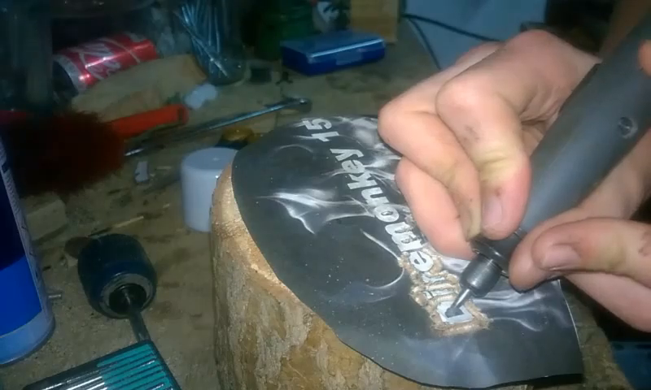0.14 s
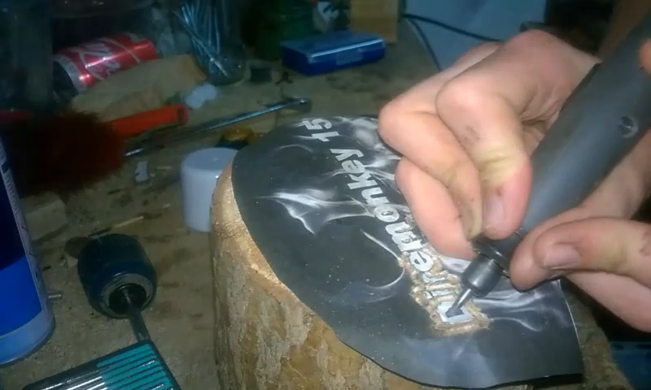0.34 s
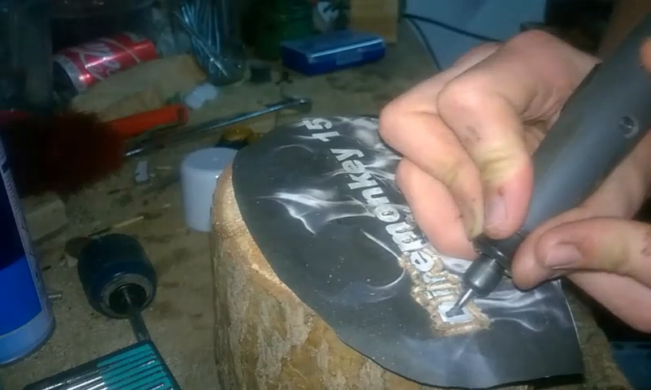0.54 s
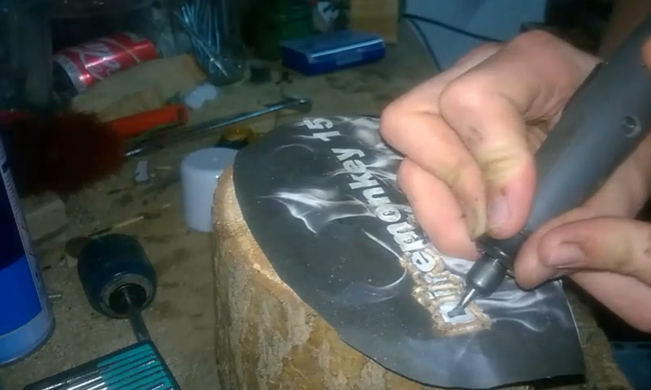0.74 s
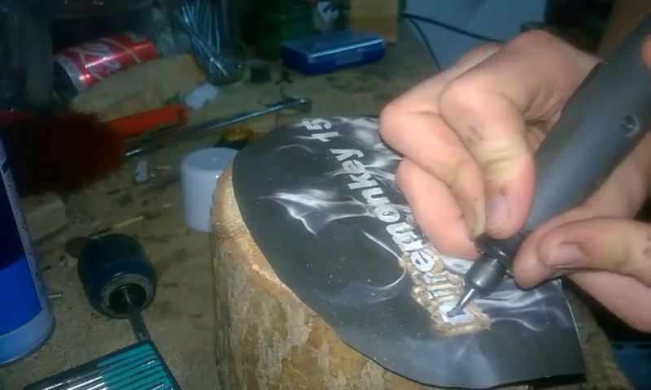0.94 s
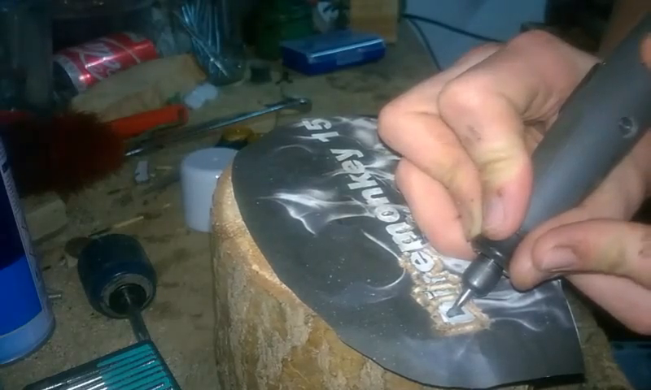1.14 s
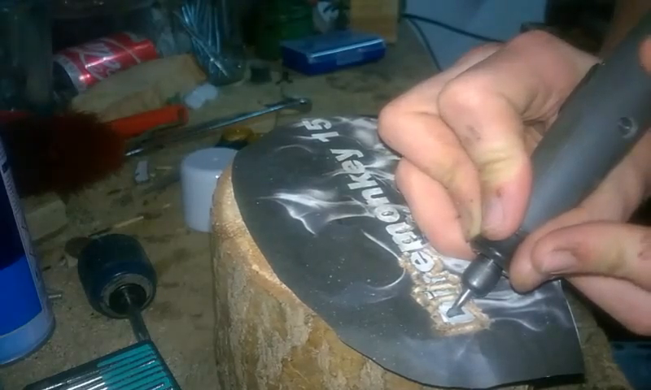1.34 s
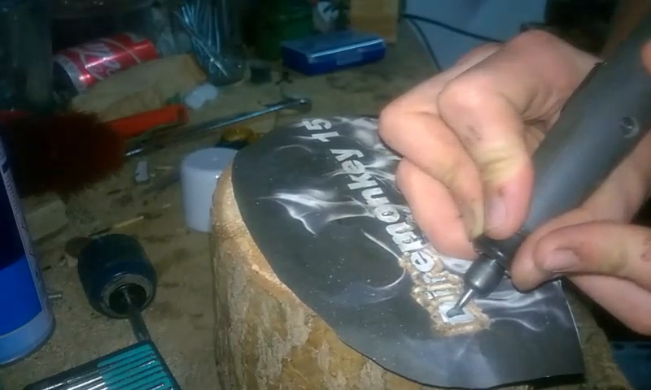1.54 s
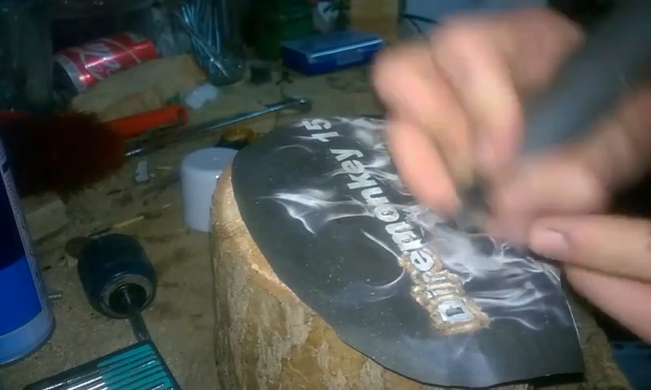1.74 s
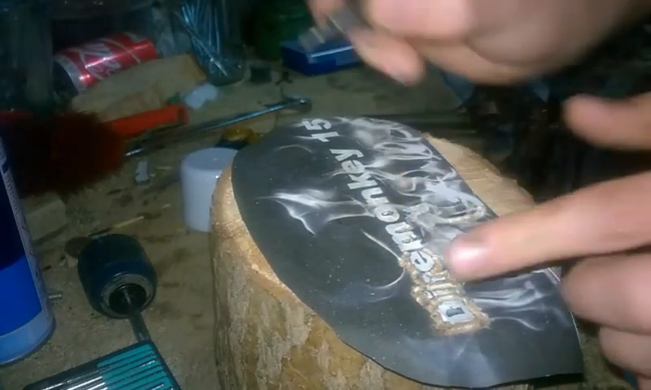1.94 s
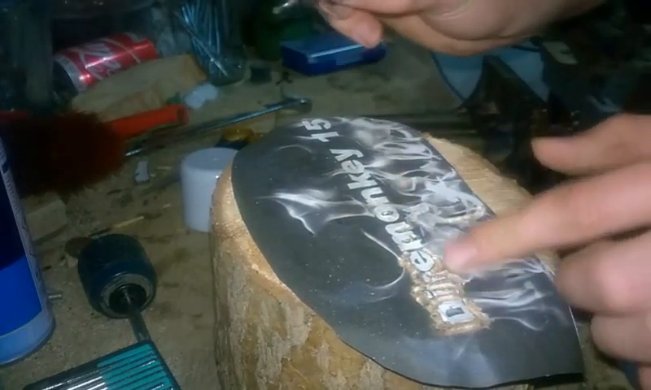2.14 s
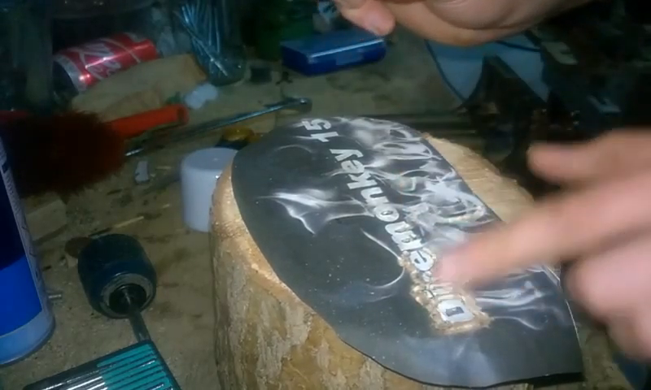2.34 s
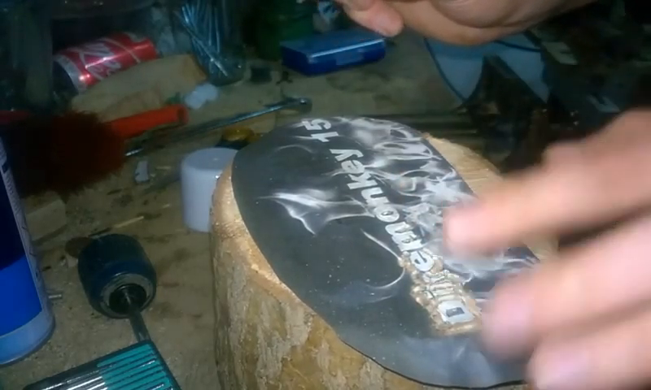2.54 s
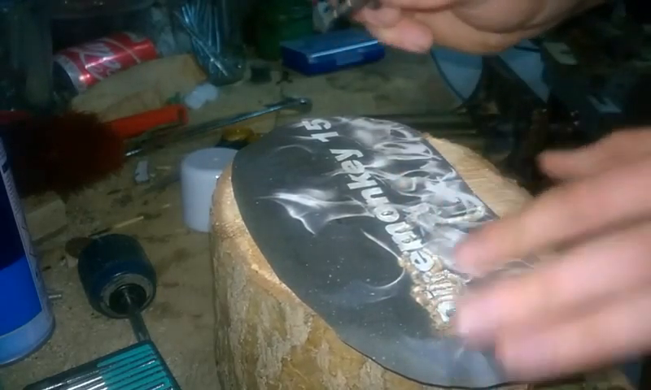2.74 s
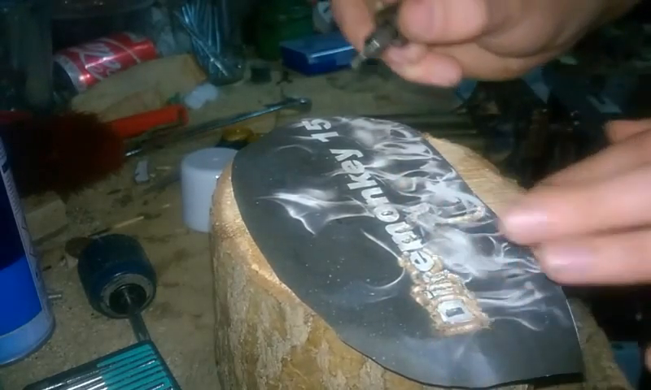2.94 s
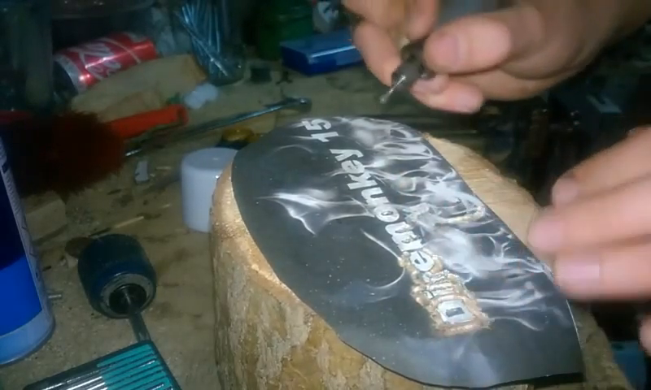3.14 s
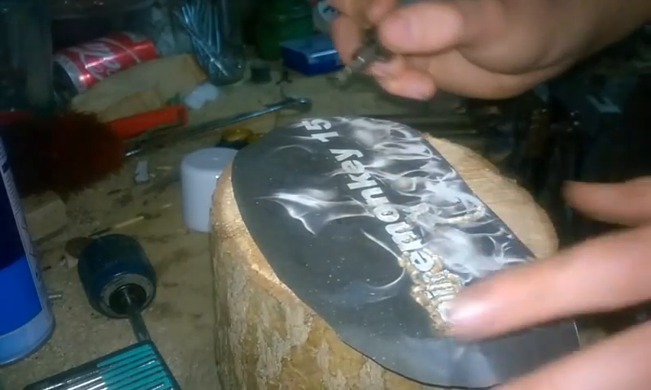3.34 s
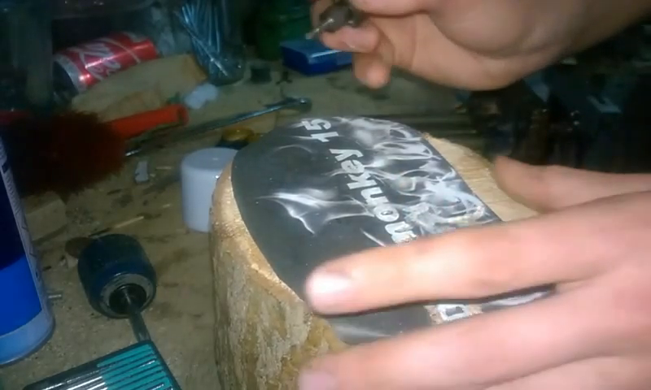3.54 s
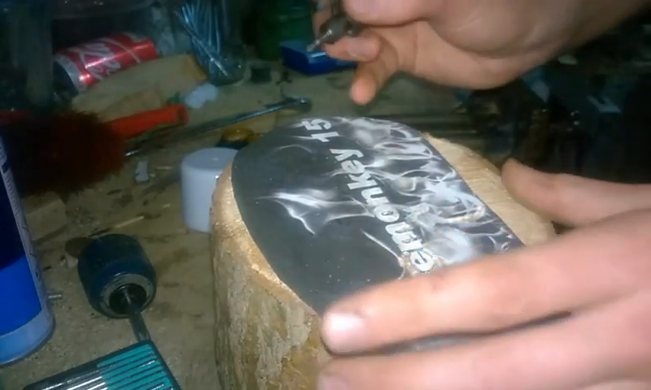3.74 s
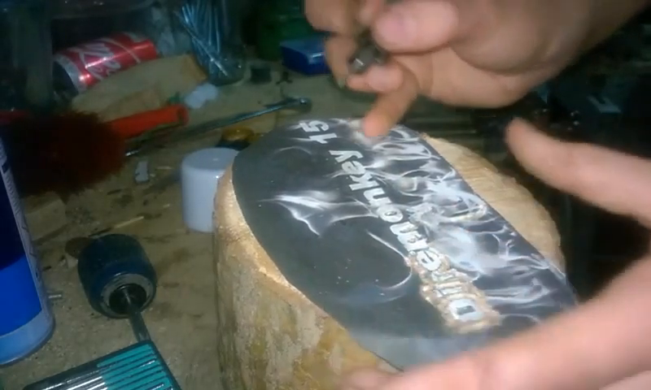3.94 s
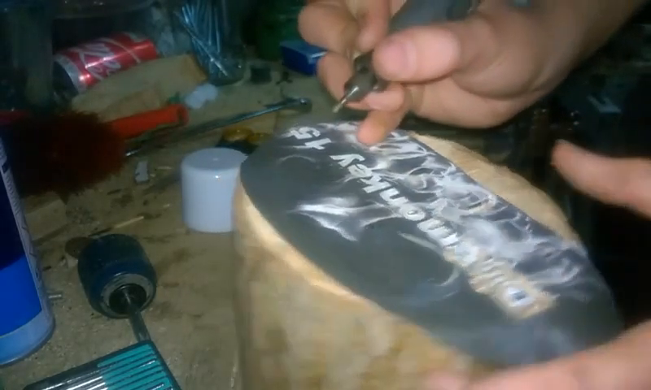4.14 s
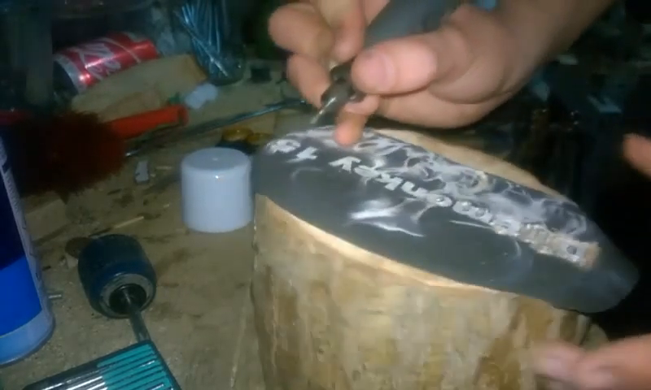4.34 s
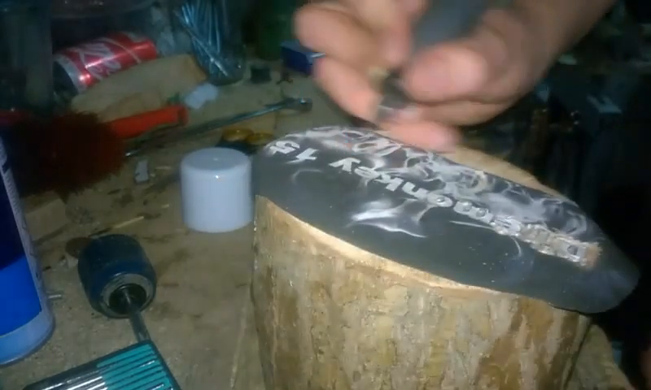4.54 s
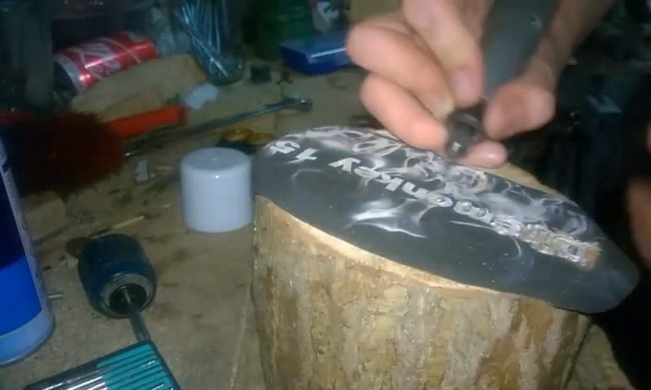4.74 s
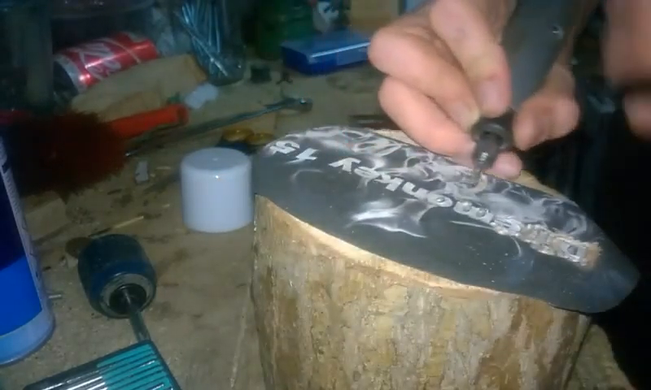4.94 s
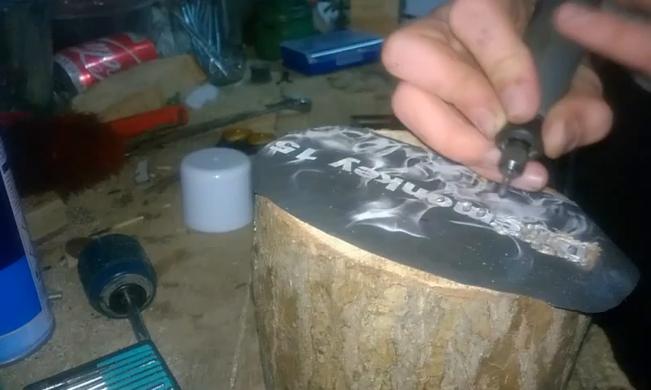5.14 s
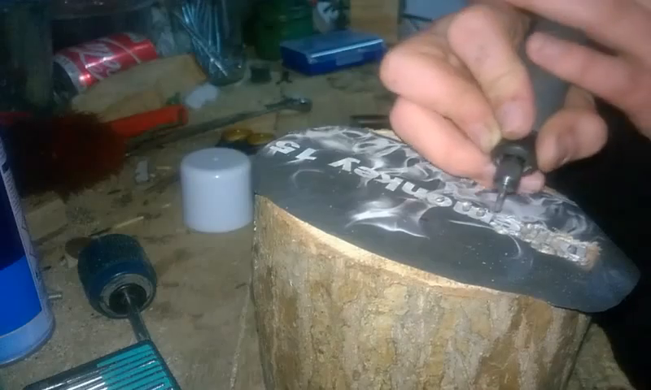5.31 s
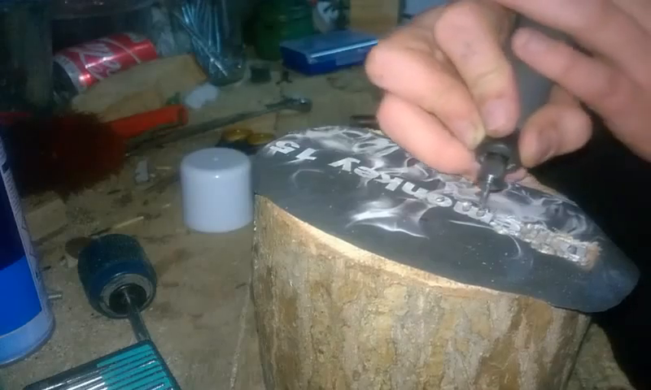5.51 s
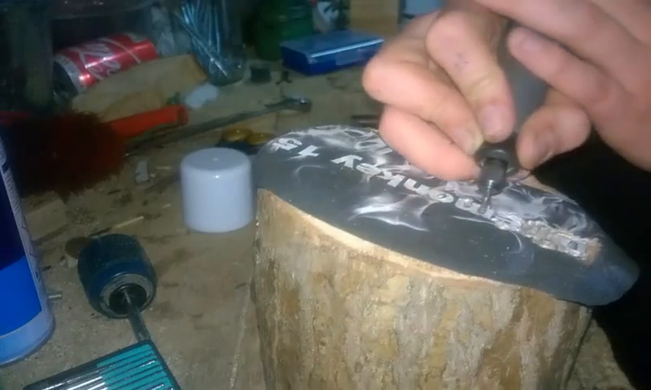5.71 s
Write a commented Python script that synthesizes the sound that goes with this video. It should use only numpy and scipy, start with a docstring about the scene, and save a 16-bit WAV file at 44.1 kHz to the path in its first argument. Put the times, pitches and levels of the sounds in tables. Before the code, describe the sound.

A hand-held rotary engraver grinds into a log end in a shed: a strong mid-low hum with dense buzzing overtones, grit and small chattering catches. Just before two seconds it lifts off, becoming much quieter and thinner, a steady whirr with high whine and airy hiss. Past four seconds the log scrapes round with soft low bumps. Close, dry, centred microphone.

```python
"""A small hand-held rotary tool engraves a log end in a shed, is lifted, then runs free while the log is turned.
Its unbalanced shaft hums, 24 commutator bars whine, and ball bearings add lines between the shaft orders.
In the wood overtones and grit join the loud hum, and the bit chatters as it drags sideways.
Fan air surrounds the tool; the log rumbles and bumps on the bench. One microphone feeds both channels;
no distances or echoes are computed, so each source has its place only through its level and colour."""
import sys
import numpy as np
from scipy import signal
from scipy.fft import rfft, irfft
from scipy.io import wavfile

SR = 44100
rng = np.random.default_rng(int(sys.argv[2]) if len(sys.argv) > 2 else 0)


def generate_wav(sig):
    """Save sig (samples, or channels by samples) to the path in sys.argv[1] as 16-bit PCM at SR."""
    pcm = np.round(np.clip(np.atleast_2d(sig).T, -1, 1) * 32767).astype(np.int16)
    wavfile.write(sys.argv[1], SR, pcm)


N = 254456

# shaft speed, sagging under load: (t/s, speed/turns per s)
SPEED = [(0.0, 366.7), (0.2, 365.9), (0.45, 363.4), (0.6, 364.0), (0.9, 362.5), (1.07, 364.0),
         (1.27, 370.0), (1.4, 371.4), (1.61, 372.3), (1.75, 371.6), (1.98, 377.0), (2.17, 378.5),
         (2.55, 378.7), (3.0, 378.2), (3.35, 376.8), (3.65, 377.5), (3.95, 377.6), (4.1, 378.3),
         (4.55, 377.5), (4.85, 375.8), (5.3, 376.3), (5.6, 375.4), (5.77, 375.9)]
# unbalance hum, loud while the log sounds along: (t/s, level/dB)
HUM = [(0.0, -20), (0.03, -20.5), (0.3, -28), (0.45, -23), (0.95, -20.5), (1.06, -23.5), (1.12, -38),
       (1.19, -23.5), (1.25, -20), (1.62, -19), (1.72, -25.5), (1.77, -22.5), (1.81, -34), (2.15, -38),
       (5.09, -35), (5.41, -35.5), (5.71, -33.5), (5.77, -34)]
# commutator whine, which beams and so changes with the grip: (t/s, level/dB)
WHINE = [(0.0, -48), (0.05, -43), (0.26, -30.5), (0.32, -43), (0.35, -38), (1.11, -40.5), (1.12, -30.5),
         (1.19, -46), (1.29, -31), (1.78, -33), (1.99, -46), (2.17, -28), (2.54, -38), (2.6, -32.5),
         (2.84, -37), (3.16, -33.5), (3.47, -44), (3.52, -47), (3.7, -34.5), (3.91, -40.5), (4.29, -30),
         (4.44, -48), (4.76, -39.5), (4.77, -49), (5.01, -38.5), (5.77, -38.5)]
MAINS_RIPPLE_HZ, RIPPLE_DB = 100, -22   # current ripple puts side tones around the whine

# shaft orders: (multiple of shaft speed, plunging level/dB, dragging level/dB, free level/dB)
SHAFT_ORDERS = [(2, -80, -80, -55), (3, -80, -80, -57), (5, -80, -80, -52), (6, -44, -47, -52),
                (7, -44, -44, -54), (8, -45, -47, -52), (9, -45, -51, -54), (10, -49, -50, -57),
                (11, -45, -57, -61), (12, -45, -57, -80), (13, -55, -57, -69), (14, -56, -59, -60),
                (15, -59, -54, -60), (16, -55, -47, -55), (17, -59, -57, -61), (18, -60, -52, -61),
                (19, -56, -56, -66), (20, -60, -69, -65), (21, -59, -60, -63), (22, -58, -61, -64),
                (23, -51, -53, -52), (25, -51, -49, -51), (26, -50, -54, -55), (27, -54, -53, -65),
                (28, -56, -62, -61), (29, -57, -55, -55), (30, -57, -62, -59), (31, -60, -63, -65),
                (32, -67, -59, -59), (33, -61, -55, -68), (34, -61, -64, -59), (35, -57, -54, -64),
                (36, -58, -63, -61), (37, -61, -57, -62), (38, -63, -57, -68), (39, -71, -66, -68),
                (40, -63, -62, -59), (41, -65, -66, -70)]
# bearing lines: (ball-pass multiple, shaft multiple, cutting level/dB before the stage offset, free level/dB)
BEARING_LINES = [(-2, 17, -50, -64), (-1, 4, -50, -80), (-1, 5, -52, -80), (-1, 7, -53, -80),
                 (-1, 8, -54, -68), (-1, 12, -52, -80), (-1, 13, -51, -76), (-1, 14, -52, -57),
                 (-1, 15, -48, -69), (-1, 16, -54, -78), (1, -1, -49, -66), (1, 0, -44, -61),
                 (1, 1, -43, -80), (1, 2, -44, -54), (1, 3, -45, -52), (1, 4, -51, -61), (1, 5, -50, -80),
                 (1, 6, -43, -53), (1, 7, -42, -53), (1, 8, -49, -80), (1, 9, -53, -68), (1, 10, -48, -80),
                 (2, -2, -53, -69), (2, -1, -48, -80), (2, 0, -52, -62), (2, 1, -42, -51), (2, 2, -43, -63),
                 (2, 3, -41, -49), (2, 4, -36, -65), (2, 5, -47, -56), (2, 6, -51, -64), (2, 7, -51, -67),
                 (2, 10, -54, -80), (3, -4, -54, -80), (3, -3, -54, -51), (3, -1, -50, -80),
                 (3, 0, -42, -69), (3, 1, -42, -57), (3, 2, -46, -67), (3, 4, -53, -68), (3, 7, -50, -66),
                 (3, 9, -54, -80), (4, -3, -45, -65), (4, -2, -52, -80), (4, -1, -43, -64),
                 (4, 7, -54, -77), (5, -6, -51, -69)]
BALL_PASS_CUT, BALL_PASS_FREE = 3.0872, 3.0908   # ball passes per turn; load shifts the contact angle
START_SCATTER = .14   # turns (spread) by which a bearing line strays from its shaft order at the start
# unsteady lines of a looser bearing: (multiple of shaft speed, width/Hz, level/dB)
LOOSE_BEARING = [(.53, 17, -55), (1.53, 2.4, -63), (2.73, 12, -53), (5.84, 15.6, -50), (6.53, 7.6, -51),
                 (9.63, 6.8, -54), (10.9, 22, -48.5)]

# stages of the cut: touches down, enters, plunges, sits deep, slips, drags, pulls out, skims the edge
# (start t/s, end t/s, sideways drag/0-1, bearing line offset/dB, knock level/dB, grit level/dB,
#  2nd, 3rd, 4th and 5th shaft order level/dB)
CUT_STAGES = [(0, 0.078, 0.7, -5, -37, -35.5, -40, -32.5, -41, -37),
              (.16, .26, 0.9, -1.5, -35.5, -34.5, -43.5, -31, -42, -31),
              (0.392, .6, 0.5, 0, -36, -37, -33.5, -34, -54, -36),
              (0.722, 1.0, 0.2, -1, -32.5, -39.5, -32, -39.5, -60, -36),
              (1.143, 1.24, .7, -1.5, -38, -37.5, -34.5, -35.5, -38, -32),
              (1.345, 1.58, .9, -8, -34.5, -37, -36.5, -38, -47, -47.5),
              (1.63, 1.737, .8, -5.5, -34, -36, -36, -38.5, -41, -35.5),
              (1.773, 1.82, 0.7, -9.5, -36, -43, -58, -50, -53, -54)]
LIFT_S, LIFT_TAKES_S = 1.794, 0.044
# bit tearing fibres: (f/Hz, relative density level/dB per Hz)
GRIT_SPECTRUM = [(40, -44), (110, -25), (170, -2), (260, -3.5), (480, -7.5), (730, -4.5), (1100, -7),
                 (2200, -12), (3400, -13), (5300, -24), (8000, -13.5), (11000, -20), (16000, -31)]
# the bit catches and slips: (t/s, peak level/dB)
CATCHES = [(1.0527, -21), (1.14, -11), (1.2015, -11), (1.2303, -16), (1.2917, -18), (1.358, -23),
           (1.5361, -22), (1.602, -12), (1.692, -11), (1.724, -8.5), (1.7651, -12), (1.794, -9.5)]
CATCH_S = 0.0039   # spread of a catch, and its delay after the listed time
CATCH_CREST_DB = 17.5   # peak of a knock over the rms of the knock train
# resonances of the log: (f/Hz, width/Hz, relative level/dB)
LOG_MODES = [(2136, 66, 0.5), (3450, 1100, 2), (4420, 2100, -17.5), (6500, 960, -16)]

# cooling-fan air and shed: (f/Hz, relative density level/dB per Hz)
AIR_SPECTRUM = [(20, -31), (55, -11), (130, -21), (200, -17.5), (280, -24.5), (500, -26.5), (750, -20),
                (1400, -11), (2400, -16.5), (4300, -13.5), (5300, -18.5), (6600, -14.5), (9300, -18),
                (16000, -26.5)]
AIR_DB = -34.5
FAN_BEAT = .12   # rms depth of the air's pulse, once a turn

# low rumble through the bench, strongest while the log is dragged round: (t/s, level/dB)
DRAG_RUMBLE = [(0, -55.5), (1.8, -55), (2.4, -59), (3.3, -56), (3.45, -52), (4.15, -49.5), (4.22, -49),
               (4.29, -39), (4.36, -37.5), (4.45, -41), (4.58, -53), (5.77, -51.5)]
# resonances of the bench: (f/Hz, width/Hz, relative level/dB)
BENCH_MODES = [(56, 37, 6), (101, 60, -9.5), (215, 79, -26)]
# the log bumps the bench as it turns: (t/s, peak level/dB)
BUMPS = [(4.283, -30), (4.327, -32), (4.346, -34), (4.364, -25), (4.4, -34), (4.42, -31)]
# resonances of a bump: (f/Hz, width/Hz, relative level/dB)
BUMP_MODES = [(75, 41, -0.5), (160.7, 94, -1), (260, 160, -9)]
BUMP_SOFT_HZ = 150

# the free tool is lifted, swung aside, tilted, resting, waiting, lowered, aimed, poised: (start t/s, end t/s)
POSES = [(1.85, 2.07), (2.16, 2.53), (2.7, 3.1), (3.25, 2.85), (4.25, 4.57), (4.8, 4.97), (5.06, 5.3),
         (5.42, 5.77)]
# steady lines that the pose brings out: (ball-pass multiple, shaft multiple)
FREE_LINES = [(0, 4), (0, 12), (1, 1), (2, -1), (1, 5), (3, -1)]
# one row per steady line: (level/dB in each of the eight poses)
FREE_LINE_LEVELS = [(-53, -42.5, -42, -43.5, -46.5, -57, -52, -46),
                    (-47, -45.5, -43, -48.5, -48, -49, -48, -48),
                    (-40.5, -44.5, -54, -44, -40.5, -49, -48, -45),
                    (-39, -59, -64, -53, -56, -45, -37.5, -33.5),
                    (-49, -43.5, -48, -48, -50, -39, -52, -56),
                    (-45, -54, -41, -45, -47.5, -49, -40.5, -40)]
# loudest unsteady lines: (multiple of shaft speed, width/Hz, (level/dB in each pose))
LOOSE_LOUD = [(3.455, 17, (-44.5, -45, -47, -51, -52, -57, -47, -46)),
              (7.43, 39, (-45, -42, -42.5, -47, -47, -49, -47, -46.5)),
              (7.85, 13.3, (-43, -62, -46, -45, -60, -36.5, -43, -44)),
              (8.54, 34, (-46, -60, -43, -52.5, -55, -47, -41, -41))]
# housing rattle: (level/dB in each pose)
RATTLE_LEVELS = (-46, -44, -46, -41, -51, -38, -38.5, -38.5)
# resonances of the housing: (f/Hz, width/Hz, relative level/dB)
HOUSING_MODES = [(1370, 180, -15), (2370, 450, 4), (3095, 1030, 3.5), (3820, 400, 5.5), (6470, 430, -9.5)]
GRIP_WAVER_DB, GRIP_WAVERS_PER_S = 1.5, 1.35   # the hand never holds quite still

RUMBLE_CUT_HZ, CUTOFF_HZ = 25, 15700   # lower and upper limits at the microphone


def from_db(db):
    """Decibels to gain."""
    return 10 ** (np.asarray(db) / 20)


def rms_one(x):
    """Scale to rms 1."""
    return x / np.sqrt(np.mean(x ** 2) + 1e-20)


def in_time(rows):
    """Columns of a curve table, one value per sample."""
    s, *columns = np.transpose(rows)
    return [np.interp(np.arange(N) / SR, s, column) for column in columns]


def in_stages(spans, values):
    """Each value placed at both ends of its span, with straight lines between; one value per sample."""
    return np.interp(np.arange(N) / SR, np.ravel(spans), np.repeat(values, repeats=2))


def coarse_drift(rate_hz):
    """Slow chance with rms 1, one value per 64 samples; two equal low-pass poles set its rate."""
    r = np.exp(-128 * np.pi * rate_hz / SR)
    chance = rng.standard_normal(N // 64 + 1002)
    return rms_one(signal.lfilter([1], [1, -2 * r, r * r], chance)[1000:])   # settled part only


def stretch(coarse):
    """One value per 64 samples to one per sample."""
    return np.interp(np.arange(N) / 64, np.arange(len(coarse)), coarse)


def waver(spread_db, rate_hz):
    """Slowly drifting gain around 0 dB."""
    return stretch(from_db(spread_db * coarse_drift(rate_hz)))


def tone(turns, start=None):
    """Sine of rms 1 on a phase counted in turns; random start unless given."""
    if start is None:
        start = rng.random()
    return np.sqrt(2) * np.sin(2 * np.pi * (turns + start))


def narrow(turns, width_hz):
    """A line smeared into narrow noise by slow complex chance; rms near 1."""
    envelope = stretch(coarse_drift(width_hz) + 1j * coarse_drift(width_hz))
    return np.real(envelope * np.exp(2j * np.pi * turns))


def coloured(points):
    """Noise with the given spectrum, joined over log frequency; rms 1."""
    hz, db = np.transpose(points)
    bins = np.arange(N // 2 + 1) * SR / N + 1e-3
    gain = from_db(np.interp(np.log(bins), np.log(hz), db))
    return rms_one(irfft(rfft(rng.standard_normal(N)) * gain, N))


def resonate(x, modes):
    """Parallel resonances, signs alternating; rms 1."""
    out = 0
    for k, (hz, width_hz, db) in enumerate(modes):
        r = np.exp(-np.pi * width_hz / SR)
        poles = [1, -2 * r * np.cos(2 * np.pi * hz / SR), r * r]
        ringing = signal.lfilter([1 - r * r, 0, r * r - 1], poles, x)
        out = out + (-1) ** k * from_db(db) * ringing
    return rms_one(out)


def motor(turns, hum_db, whine_db):
    """Unbalance hums once a turn; commutator bars whine 24 times a turn, fluttering, with mains side tones."""
    hum = from_db(hum_db) * tone(turns)
    ripple = 1 + from_db(RIPPLE_DB) * tone(MAINS_RIPPLE_HZ * np.arange(N) / SR)
    flutter = waver(1.3, 10.5)
    return hum + from_db(whine_db) * ripple * flutter * tone(24 * turns)


def shaft_orders(turns, touch, drags, starts, waver_db_per_order):
    """Whole multiples of shaft speed waver as the hand turns the tool; high ones beam and waver more."""
    out = 0
    plunging, dragging, free = touch * (1 - drags), touch * drags, 1 - touch
    for order, plunge_db, drag_db, free_db in SHAFT_ORDERS:
        gain = plunging * from_db(plunge_db) + dragging * from_db(drag_db) + free * from_db(free_db)
        sway = waver(1.5 + waver_db_per_order * order, 0.84)
        out = out + gain * sway * tone(order * turns, starts[order])
    return out


def bearing_lines(turns, passes, touch, loaded_db, starts, waver_db_per_order):
    """Ball passes mix with shaft turns; lines near one order start nearly together and throb loosely in step."""
    out, loaded, free = 0, touch * from_db(loaded_db), 1 - touch
    for balls, order, cut_db, free_db in BEARING_LINES:
        gain = loaded * from_db(cut_db) + free * from_db(free_db)
        nearest = round(BALL_PASS_CUT * balls + order)
        sway = waver(3 + waver_db_per_order * nearest, 0.57)
        start = starts[nearest] + START_SCATTER * rng.standard_normal()
        out = out + gain * sway * tone(balls * passes + order * turns, start)
    return out


def loose_bearing(turns):
    """A looser bearing gives unsteady lines, each a narrow noise at a fractional multiple of shaft speed."""
    return sum(from_db(db) * narrow(order * turns, width_hz) for order, width_hz, db in LOOSE_BEARING)


def knocks(turns, pulse, knock_db):
    """One uneven knock a turn rings the log, swelling when the bit catches."""
    t = np.arange(N) / SR
    catches = 0
    for s, db in CATCHES:
        swell = np.exp(-.5 * ((t - s - CATCH_S) / CATCH_S) ** 2)
        catches = catches + from_db(db - CATCH_CREST_DB) * swell
    wobble = 0.025 * stretch(coarse_drift(60.))   # turns: the edge meets the wood a little early or late
    bites = np.diff(np.floor(turns + wobble), prepend=0) * from_db(3.2 * rng.standard_normal(N))
    crunch = .04 * pulse * rng.standard_normal(N)
    force = from_db(knock_db) * waver(1.0, 30.) + catches
    return force * resonate(bites + crunch, LOG_MODES)


def bit(turns, touch, knock_db, grit_db, orders_db):
    """While it touches wood, the bit sounds overtones of its bite, grit pulsing once a turn, and knocks."""
    overtones = sum(from_db(db) * tone((k + 2) * turns) for k, db in enumerate(orders_db))
    pulse = np.exp(0.58 * np.cos(2 * np.pi * turns))
    grit = from_db(grit_db) * rms_one(coloured(GRIT_SPECTRUM) * pulse)
    return touch * (overtones + grit + knocks(turns, pulse, knock_db))


def air(turns):
    """Cooling air is coloured noise that beats with the shaft and wavers a little."""
    gusts = waver(0.93, 18.0)
    beat = 1 + FAN_BEAT * tone(turns)
    return from_db(AIR_DB) * gusts * beat * coloured(AIR_SPECTRUM)


def drag():
    """Wood on the bench rumbles as noise through resonances; softened impulses make a few dull bumps."""
    rumble_db, = in_time(DRAG_RUMBLE)
    rumble = from_db(rumble_db) * resonate(rng.standard_normal(N), BENCH_MODES)
    blows = np.full(N, 1e-18)
    blows[[round(s * SR) for s, db in BUMPS]] = from_db([db for s, db in BUMPS])
    soft = signal.butter(2, BUMP_SOFT_HZ, fs=SR, output="sos")   # a broad, padded contact
    bumps = resonate(signal.sosfilt(soft, blows), BUMP_MODES)
    loudest = from_db(max(db for s, db in BUMPS))
    return rumble + loudest * bumps / np.abs(bumps).max()


def posed(db):
    """Gain that follows the poses and wavers with the grip."""
    grip_db = GRIP_WAVER_DB * stretch(coarse_drift(GRIP_WAVERS_PER_S))
    return from_db(in_stages(POSES, db) + grip_db)


def held_free(turns, passes, touch):
    """Off the wood, lines swell as the tool points at the listener, and the housing rattles unevenly."""
    out = 0
    for (balls, order), db in zip(FREE_LINES, FREE_LINE_LEVELS):
        out = out + posed(db) * tone(balls * passes + order * turns)
    for order, width_hz, db in LOOSE_LOUD:
        out = out + posed(db) * narrow(order * turns, width_hz)
    shaking = rng.standard_normal(N) * waver(1.5, 83.0)
    rattle = posed(RATTLE_LEVELS) * resonate(shaking, HOUSING_MODES)
    return (1 - touch) * (out + rattle)


def scene():
    """Tool, log and air sum at one microphone, sent alike to both channels."""
    speed, = in_time(SPEED)
    start, end, *columns = np.transpose(CUT_STAGES)
    spans = np.transpose([start, end])
    drags, loaded_db, knock_db, grit_db, *orders_db = [in_stages(spans, column) for column in columns]
    drags = np.clip(drags, 0, 1)
    touch = np.clip(1 - (np.arange(N) / SR - LIFT_S) / LIFT_TAKES_S, 0, 1)   # 1 in the wood, 0 lifted
    turns = np.cumsum(speed) / SR
    passes_per_turn = BALL_PASS_FREE + touch * (BALL_PASS_CUT - BALL_PASS_FREE)
    passes = np.cumsum(speed * passes_per_turn) / SR
    starts = rng.random(size=50)   # one start phase per shaft order, shared with the bearing lines

    tool = motor(turns, *in_time(HUM), *in_time(WHINE))
    tool += shaft_orders(turns, touch, drags, starts, waver_db_per_order=.05)
    tool += bearing_lines(turns, passes, touch, loaded_db, starts, waver_db_per_order=.05)
    tool += loose_bearing(turns)
    tool += bit(turns, touch, knock_db, grit_db, orders_db)
    tool += held_free(turns, passes, touch)
    mono = tool + air(turns) + drag()
    return np.array([mono, mono])


def record(dry):
    """The microphone drops the deepest bass; the top is cut steeply."""
    bass_cut = signal.butter(2, RUMBLE_CUT_HZ, "high", fs=SR, output="sos")
    top_cut = signal.ellip(14, .2, 70, CUTOFF_HZ, fs=SR, output="sos")   # ripple 0.2 dB, stopband 70 dB down
    return signal.sosfilt(top_cut, signal.sosfilt(bass_cut, dry))


dry = scene()
out = record(dry)
generate_wav(out)
```